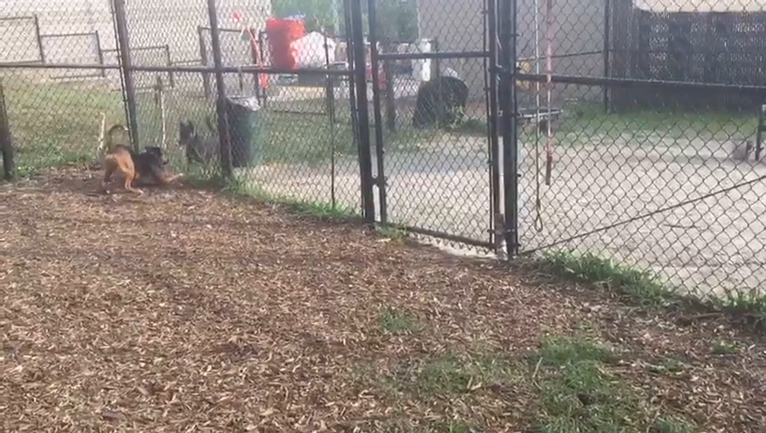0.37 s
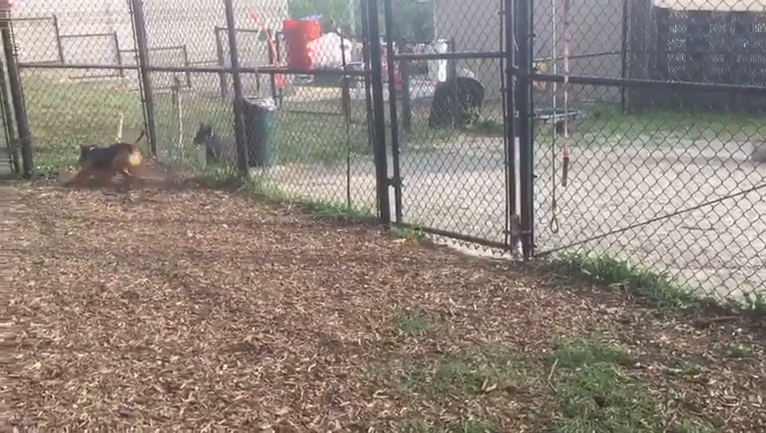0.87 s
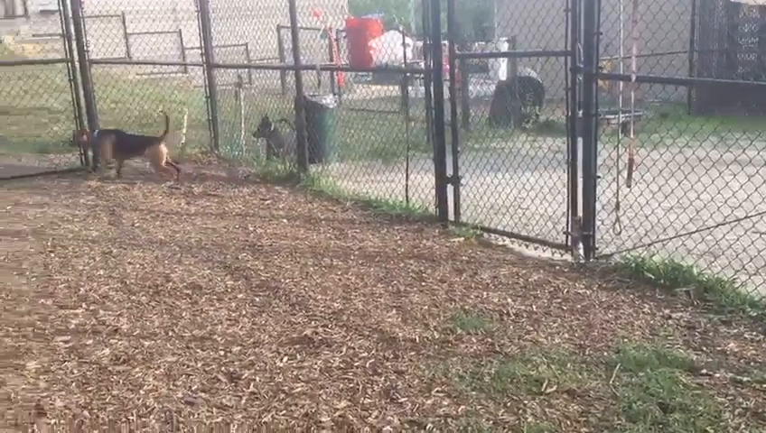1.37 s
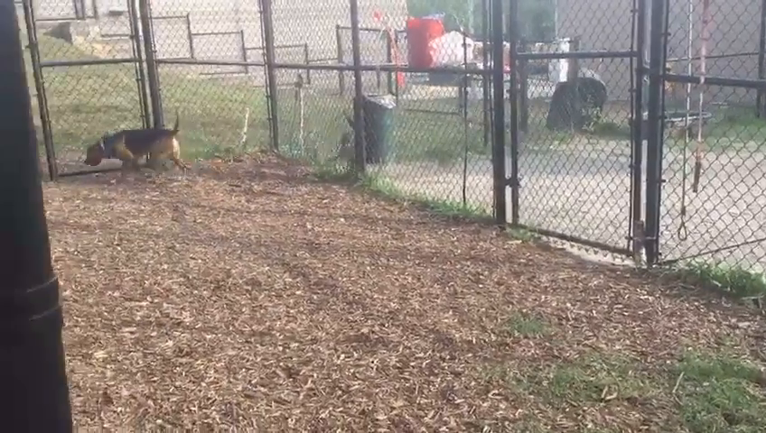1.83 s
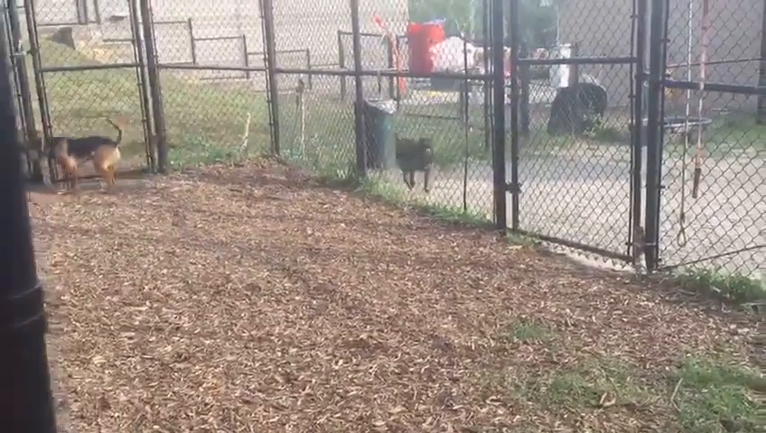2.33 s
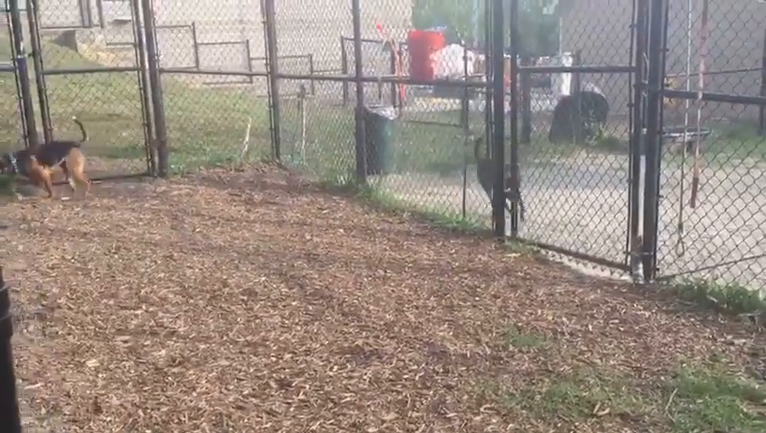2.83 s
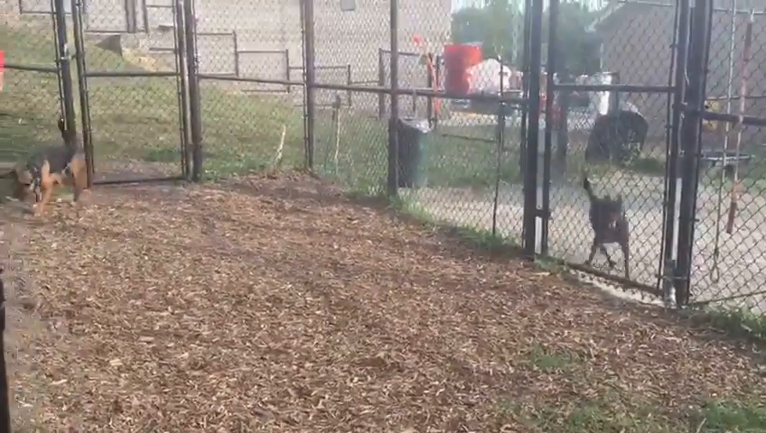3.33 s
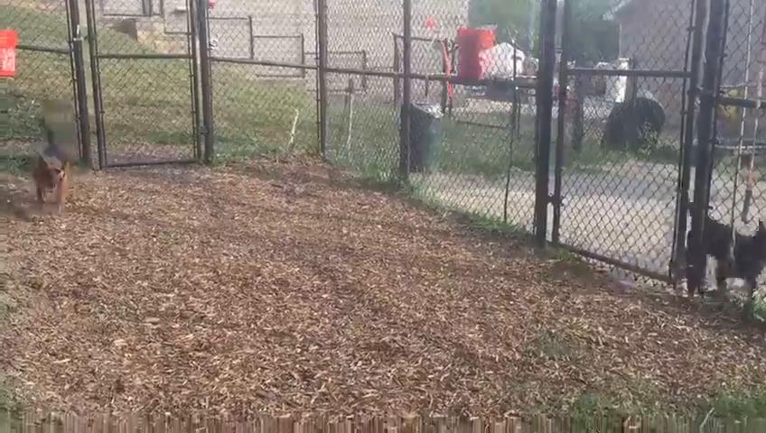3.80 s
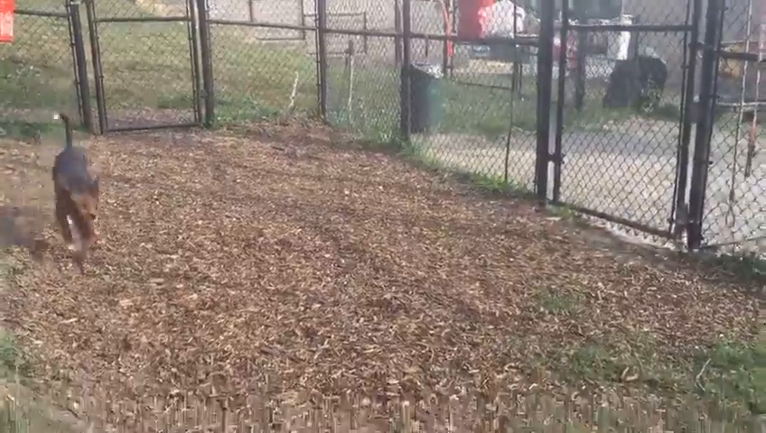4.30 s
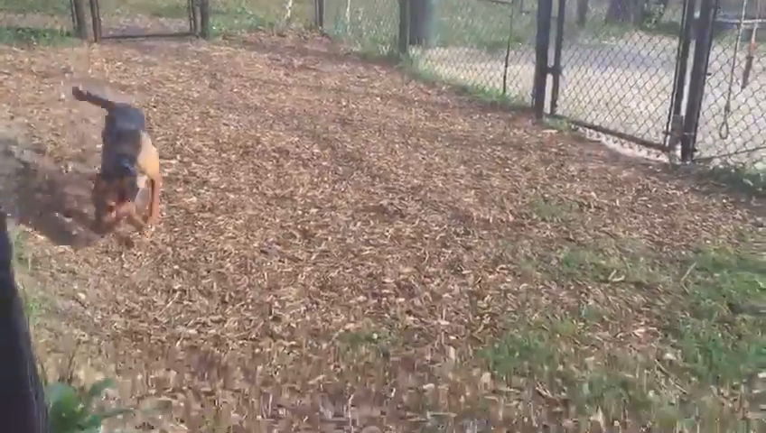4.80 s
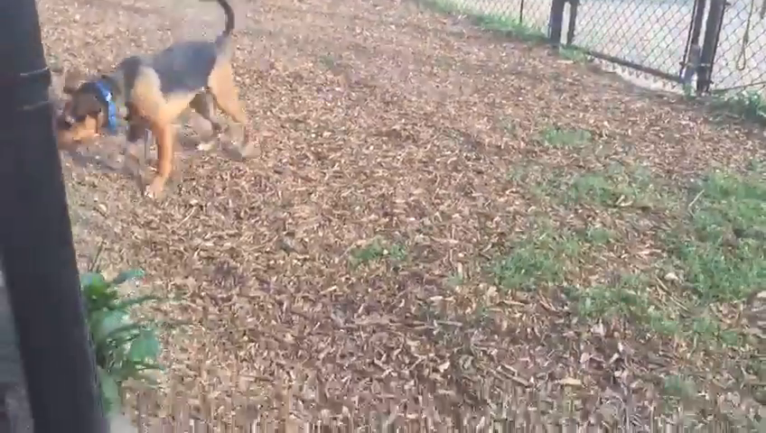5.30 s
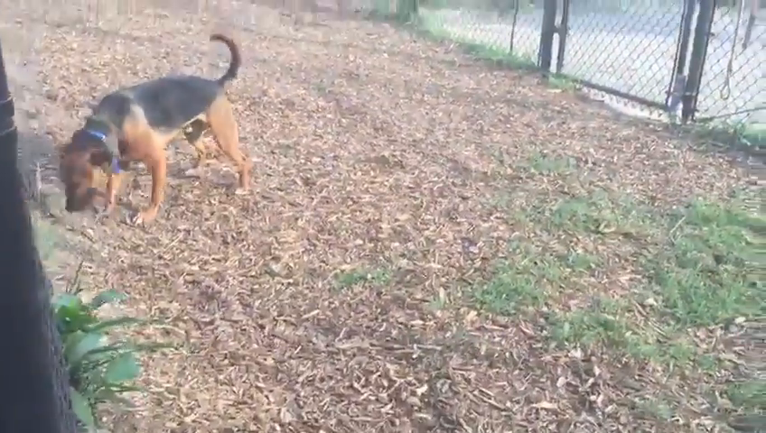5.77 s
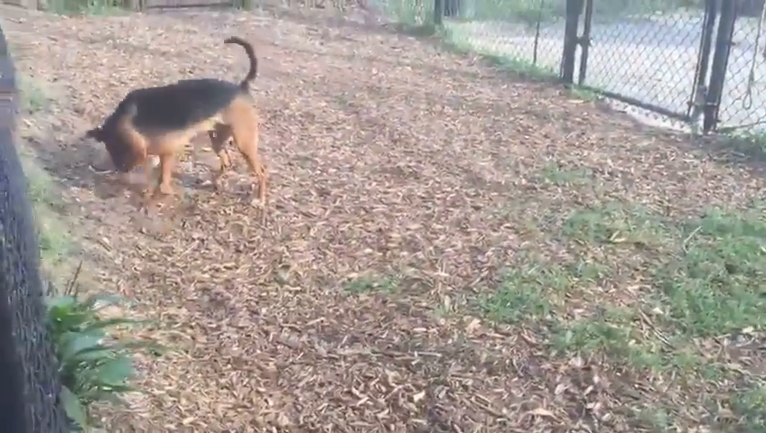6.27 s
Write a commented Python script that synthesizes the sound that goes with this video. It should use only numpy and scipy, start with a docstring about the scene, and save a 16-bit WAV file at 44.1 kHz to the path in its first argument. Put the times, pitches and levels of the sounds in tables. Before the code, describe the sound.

Single-channel handheld pickup of a playing dog: after a quiet opening of rumble, road hiss and faint paw crackles, quick high yips leap and drop in pitch, some strong, some small, with brief panting. A muffled bark closes the run. The yard returns a short faint echo. Near the end, the light dry crunch of paws on chips stands over swelling engine throb.

```python
"""A small dog yips in play in a fenced yard: gliding harmonic series, weighed by the throat, with rough noise.
A low bark, thin gliding whistles and panting of resonant noise lie between; walls return a short echo.
Paws crackle on wood chips; two slow engines throb as sums of firing orders over exhaust noise.
Coloured noise gives distant road hiss and a faint treble rustle; a wavering whine fades away early on."""
import sys
import numpy as np
from scipy import signal
from scipy.fft import rfft, irfft
from scipy.io import wavfile
from scipy.ndimage import uniform_filter1d

SR = 44100
rng = np.random.default_rng(int(sys.argv[2]) if len(sys.argv) > 2 else 0)


def wrap_up_sound(samples):
    """Save the sound to the file named by the first command line argument, as 16-bit audio."""
    columns = np.atleast_2d(samples).T
    # keep every value between -1 and 1, then stretch to whole-number steps
    tamed = np.clip(columns, -1, 1)
    steps = np.round(tamed * 32767).astype(np.int16)
    wavfile.write(sys.argv[1], SR, steps)


def gain_from_decibels(decibels):
    """Convert decibel values to linear amplitude factors."""
    exponent = np.asarray(decibels, float) / 20
    return 10 ** exponent


N = 281799


def in_time(rows):
    """Linear interpolation: the columns of a time table at every sample."""
    s, *columns = np.transpose(rows)
    return [np.interp(np.arange(N) / SR, s, c) for c in columns]


def each_call(tables, fade_s=0.0037):
    """Windowing: sample positions, edge fade and interpolated columns of every call."""
    for rows in tables:
        s, *columns = np.transpose(rows)
        at = np.arange(round(s[0] * SR), round(s[-1] * SR))
        fade = np.minimum(1, np.minimum(at - at[0], at[-1] - at) / (fade_s * SR))
        yield at, fade, [np.interp(at / SR, s, c) for c in columns]


def rms_one(x):
    """Power normalisation: scales to a root mean square of one."""
    return x / np.sqrt(np.mean(x ** 2) + 1e-20)


def at_hz(points, hz):
    """Spectral envelope: interpolates levels along a logarithmic frequency axis."""
    return np.interp(np.log(hz), np.log(np.array(points)[:, 0]), np.array(points)[:, 1])


def drift(rate_hz, size=N):
    """Low-pass filtered noise: a random wander up to a rate, with unit rms."""
    r = np.exp(-2 * np.pi * rate_hz / SR)
    run_in = round(SR / rate_hz)
    noise = rng.standard_normal(size + run_in)
    return rms_one(signal.lfilter([1], [1, -2 * r, r * r], noise)[run_in:])


def coloured(spectrum, source=None):
    """Spectral shaping: noise, or another source, band-limited to a spectrum at unit rms."""
    hz = np.maximum(np.fft.rfftfreq(N, 1 / SR), 1)
    inside = (hz > spectrum[0][0]) & (hz < spectrum[-1][0])
    source = rng.standard_normal(N) if source is None else source
    return rms_one(irfft(rfft(source) * gain_from_decibels(at_hz(spectrum, hz)) * inside, N))


# colour of turbulent air in throat and mouth: (frequency [Hz], density [dB per Hz])
MOUTH_AIR = [(500, -14), (1000, -12), (1700, -3), (2500, -5), (3100, -10)]


def voice(calls, voices, throat, jitter=0.023, shimmer=0.45, throb=0.71, bend=0.33):
    """Source-filter principle: fold harmonics weighed by the throat; roughness modulates and adds air."""
    slack_tilt = 0.11      # dB per octave for each octave per s of fall: slackening folds lose overtones
    slack_evens = 31       # octaves per s of fall that shrink the odd-even contrast by a factor e
    effort_tilt = 0.3      # dB per octave for each dB below -15.5 dB: soft sounds have fewer overtones
    rasp_db = -11          # air leaking past fully rough folds, against the voice
    out, air = np.zeros(N), coloured(MOUTH_AIR)
    k = np.arange(1, 20)[:, None]      # harmonic numbers
    for (at, fade, (hz, level_db, rough)), (tilt, odd_db, throb_hz) in zip(each_call(calls), voices):
        size = len(at)
        rough = np.clip(rough, 0, 1)
        falling = np.clip(-np.gradient(np.log2(hz)) * SR, 0, 80)      # octaves per s
        tilt = tilt + slack_tilt * falling - effort_tilt * (level_db + 15.5)
        odd_db = odd_db * np.exp(-falling / slack_evens)

        flutter = 2 * np.pi * np.cumsum(throb_hz * (1 + .15 * drift(40, size))) / SR
        shaken_hz = hz * (1 + jitter * (rough + 0.12) * drift(280, size))
        phase = 2 * np.pi * np.cumsum(shaken_hz) / SR
        phase += bend * rough * np.cos(flutter)      # the flutter also hurries and delays the cycles

        harmonic_db = at_hz(throat, k * hz) - tilt * np.log2(k) + odd_db * (k % 2)
        strength = gain_from_decibels(harmonic_db) * (k * hz < throat[-1][0])
        strength /= np.sqrt(np.sum(strength ** 2, axis=0) / 2)      # level evened
        # resonances spread each pulse in time
        tone = np.sum(strength * np.sin(k * phase + .6 * k ** 2), axis=0)
        shaking = 1 + rough * (throb * np.sin(flutter) + shimmer * drift(500, size))
        out[at] += gain_from_decibels(level_db) * fade * tone * shaking
        out[at] += gain_from_decibels(level_db + rasp_db) * fade * rough * air[at]
    return signal.sosfilt(signal.butter(4, 330, "high", fs=SR, output="sos"), out)


# one table a yip; the pitch jumps where the folds change register:
# (time [s], pitch [Hz], level [dB], roughness [0-1])
YIP_CALLS = [
    [(1.728, 928, -43.5, 0), (1.733, 961, -22, 0.08), (1.742, 1047, -18, 0), (1.751, 1208, -18, .15),
     (1.7535, 1689, -13, 0), (1.768, 1643, -7.5, .2), (1.785, 1736, -7, 0.28), (1.8, 1820, -9, 0.24),
     (1.813, 1830, -16.5, .25), (1.819, 1444, -13.5, 0.08), (1.83, 1210, -25, 0.2)],
    [(1.986, 1560, -37, 0.08), (1.993, 1527, -16.5, 0), (2.0, 1645, -21, 0.3), (2.012, 1663, -10.5, .15),
     (2.0148, 1600, -10, 0.7), (2.0154, 789, -16.5, 0.4), (2.025, 676, -17, 0.6), (2.036, 682.4, -15, 0.5),
     (2.047, 747, -11, 0.2), (2.056, 706.5, -16, 0.3), (2.068, 620, -16.5, .45), (2.087, 460, -30, 0.5),
     (2.098, 392, -39, 0.2)],
    [(2.477, 2110, -26, 0), (2.486, 2019, -15.5, 0.11), (2.508, 1939, -4, 0.03), (2.517, 1833, -10, 0.3),
     (2.523, 1522, -4, .12), (2.529, 1091, -15, 0), (2.536, 946, -12, 0), (2.542, 773, -30.5, 0.3),
     (2.55, 670, -42, .2)],
    [(2.941, 1527, -43, 0.1), (2.946, 1330, -19.5, 0.3), (2.951, 940, -25, 0.3), (2.956, 798, -21.5, 0.3),
     (2.964, 766, -47, 0)],
    [(3.304, 947, -41, 0.2), (3.318, 939, -27.5, .1), (3.338, 1037, -19.5, .1), (3.35, 1073, -16, 0.01),
     (3.358, 1162, -24, .1), (3.365, 1175, -36, .03)],
    [(3.778, 2213, -31, 0.08), (3.785, 1985, -21, 0), (3.81, 1992, -14.5, 0.1), (3.82, 1905, -10, .2),
     (3.827, 1980, -26.5, 0.08), (3.832, 1502, -4, 0.02), (3.838, 1214, -16.5, 0), (3.845, 943, -15, 0.2),
     (3.853, 828, -22, 0.1), (3.858, 770, -48, .1)],
    [(4.181, 930, -35, 0.07), (4.188, 1058, -15.5, .1), (4.195, 1060, -15, 0.06), (4.202, 1176, -17, 0),
     (4.207, 1290, -40, .06)],
    [(4.244, 2138, -45, 0.4), (4.252, 2060, -23.5, 0), (4.258, 2142, -24.5, 0.5), (4.278, 2100, -26.5, 0.2),
     (4.285, 2055, -24.5, .4), (4.292, 1960, -41, 0.4)],
    [(5.098, 1112, -46, .6), (5.108, 1210, -36, 0.9), (5.115, 1311, -35, .5), (5.121, 1240, -28.5, 0.5),
     (5.127, 1290, -53, 0.5)],
]
# folds of each yip: (basic source tilt [dB per octave], odd over even harmonics [dB], slower flutter [Hz])
YIP_FOLDS = [(3, -4.5, 620), (-1, -1.5, 170), (-1, 16, 499), (-2.5, -0.5, 400), (3, 1.5, 280),
             (6, -7.5, 420), (4.5, 5.5, 300), (-5.5, -4, 400), (-5, -8.5, 310)]
# throat resonances in the yips: (frequency [Hz], gain [dB])
YIP_THROAT = [(300, -7.5), (700, -10), (1100, -4), (1600, -0.5), (2200, -5.5), (2750, -16.5), (3050, -26.5),
              (3300, -38), (4300, -22.5), (5300, -50.5), (7000, -50.5), (7900, -13), (8600, -66)]


def yips():
    """Register change in phonation: high harmonic glides whose pitch leaps."""
    return voice(YIP_CALLS, YIP_FOLDS, YIP_THROAT)


# the bark's course: (time [s], pitch [Hz], level [dB], roughness [0-1])
BARK_CALL = [
    [(4.642, 396.5, -42.5, 0.35), (4.657, 412, -28, .25), (4.678, 389, -25, .2), (4.688, 410, -24.5, .2),
     (4.698, 438, -22, 0.56), (4.704, 390, -30, .3), (4.71, 410, -45, .3)],
]
# its folds: (basic source tilt [dB per octave], odd over even harmonics [dB], slower flutter [Hz])
BARK_FOLDS = [(-4, .3, 250)]
# throat resonances with the mouth half closed: (frequency [Hz], gain [dB])
HALF_CLOSED_THROAT = [(300, -10.5), (800, -10.5), (1220, 3.5), (1600, -3.5), (2000, -8), (2450, -7),
                      (3200, -12.5), (3600, -35), (8400, -41)]


def bark():
    """Source-filter principle: a low harmonic call through a half-closed mouth."""
    return voice(BARK_CALL, BARK_FOLDS, HALF_CLOSED_THROAT)


# thin whistles through the nose:
# (start [s], length [s], starting pitch [Hz], glide [Hz per s], level before the envelope [dB])
NOSE_WHISTLES = [(2.372, 0.034, 4500, 2000, -38), (2.462, .02, 4800, 1000, -50),
                 (2.823, 0.022, 4740, 1497, -36.5), (3.707, 0.022, 4590, 10000, -34),
                 (3.758, 0.03, 5000, 24996, -49.5), (4.227, 0.014, 4630, 14994, -33),
                 (4.238, 0.017, 5140, 11998, -40), (3.285, 0.02, 4960, -2000, -53),
                 (4.162, .014, 4870, 1000, -50)]


def whistles(attack_s=0.0036, release_s=0.015):
    """Linear frequency modulation: single tones glide under a squared envelope."""
    out = np.zeros(N)
    for start, length, hz, glide, db in NOSE_WHISTLES:
        t = np.arange(round(length * SR)) / SR
        shape = np.minimum(1, np.minimum(t / attack_s, (length - t) / release_s)) ** 2
        tone = np.sqrt(2) * np.sin(2 * np.pi * (hz * t + glide * t ** 2 / 2))
        out[round(start * SR):][:len(t)] += gain_from_decibels(db) * shape * tone
    return out


# puffs of air through the open mouth:
# (peak time [s], rise [s], fall [s], peak hiss level [dB], mouth shape [factor on resonance frequency])
BREATH_PUFFS = [(1.8, 0.065, 0.061, -35, 1.3), (1.742, .015, .02, -50, 1.02),
                (1.85, 0.032, 0.051, -52.5, 1.02), (2.045, 0.063, 0.072, -33, 1.1),
                (2.002, 0.013, 0.028, -46.5, 0.57), (2.529, 0.078, .03, -36, 1),
                (2.561, 0.041, 0.025, -38.5, 1.1), (2.975, 0.038, 0.066, -52, 0.71),
                (3.279, 0.016, 0.029, -47, 0.85), (3.352, 0.018, 0.016, -53, 1.4),
                (3.448, 0.11, .075, -44, 1.1), (3.716, .01, .016, -50, .9), (3.83, .055, .045, -34.5, .9),
                (3.873, 0.021, .07, -41.5, .95), (4.268, 0.039, .05, -34.5, 0.89),
                (4.19, .025, 0.052, -52, .96), (4.33, 0.051, 0.042, -39.5, .85),
                (4.73, 0.078, 0.025, -39, 0.7), (5.096, .08, 0.077, -49, .99)]
# mouth resonances at shape 1: (frequency [Hz], width [Hz], relative level [dB])
BREATH_RESONANCES = [(3500, 620, -3.5), (4200, 860, -2.5), (5970, 1600, -2), (7500, 2100, -16.5),
                     (8260, 810, -6)]


def breaths(flicker_db=4.5, flicker_hz=45):
    """Turbulence through resonators: independently flickering hiss bands and duller throat noise."""
    span_db, rounding = 23.5, 1.66      # range of each puff; power of its fall: 1 pointed, 2 round
    dull_db, dull_follows = -49, 0.24   # throat noise under a puff of -44.5 dB; its share of the swing
    out = np.zeros(N)
    dull = coloured(MOUTH_AIR) * gain_from_decibels(flicker_db * drift(flicker_hz))
    puffs = [[(s - rise, -1), (s, 0), (s + fall, 1)] for s, rise, fall, *_ in BREATH_PUFFS]
    for (at, fade, (away,)), (*_, peak_db, shape) in zip(each_call(puffs, fade_s=0.004), BREATH_PUFFS):
        hiss = 0
        hiss_db = peak_db - span_db * np.abs(away) ** rounding
        for hz, width_hz, db in BREATH_RESONANCES:
            edges = [shape * hz - width_hz / 2, shape * hz + width_hz / 2]
            band = signal.butter(2, edges, "band", fs=SR, output="sos")
            flicker = gain_from_decibels(db + flicker_db * drift(flicker_hz, len(at)))
            hiss = hiss + flicker * rms_one(signal.sosfilt(band, rng.standard_normal(len(at))))
        throat = gain_from_decibels(dull_db + dull_follows * (hiss_db + 44.5)) * dull[at]
        out[at] += fade * (gain_from_decibels(hiss_db) * rms_one(hiss) + throat)
    return out


# ground, fence and wall: (delay [s], level [dB])
YARD_ECHOES = [(.012, -20), (.036, -26), (.052, -27)]


def yard(x, smear_s=0.0036, tail_t60_s=0.2, tail_db=-21):
    """Convolution with an impulse response: smeared reflections and a scattered, decaying tail."""
    t = np.arange(round(.4 * SR)) / SR
    # tail_db is the energy of the decay from zero delay; only its part after 8 ms sounds
    power = gain_from_decibels(tail_db - 60 * t / tail_t60_s) ** 2 * 14 / tail_t60_s * (t > .008)
    for s, db in YARD_ECHOES:
        power += gain_from_decibels(db) ** 2 * (t > s) * np.exp(-np.maximum(t - s, 0) / smear_s) / smear_s
    return signal.fftconvolve(x, np.sqrt(power / SR) * rng.standard_normal(len(t)))[:N]


# paws on wood chips: (onset [s], level before rise and decay [dB])
PAW_STEPS = [(0.7505, -50), (1.0153, -44.5), (1.09, -51.5), (1.1453, -57.5), (1.278, -57), (1.92, -43.5),
             (2.7362, -50), (5.2048, -44), (5.3207, -41.5), (5.4935, -42), (5.5468, -44.5), (5.633, -50),
             (5.712, -45.5), (5.851, -42.5), (5.902, -45.5), (5.96, -51), (6.1544, -50), (6.2273, -48)]
# colour of the crackle: (frequency [Hz], density [dB per Hz])
CHIP_COLOUR = [(2500, -21.5), (4000, -5), (6000, -9), (8300, 4.5)]


def steps(grains_per_s=4800.0, spread_db=1.0, rise_s=0.012, t60_s=0.13):
    """Random impulse process: each paw sets off a crackle of small chips that decays exponentially."""
    sizes = gain_from_decibels(spread_db * np.minimum(rng.exponential(1, N), 5)) * rng.choice([-1, 1], N)
    grains = sizes * (rng.random(N) < grains_per_s / SR)
    crackle = coloured(CHIP_COLOUR, grains)
    t, shape = np.arange(N) / SR, np.zeros(N)
    for s, level_db in PAW_STEPS:
        since = np.maximum(t - s, 0)
        shape += gain_from_decibels(level_db - 60 * since / t60_s) * np.minimum(1, since / rise_s)
    return shape * crackle


def order(phase, k, db):
    """Harmonic motion: one multiple of the firing cycle, at a random starting phase."""
    return np.sqrt(2) * gain_from_decibels(db) * np.sin(k * phase + 2 * np.pi * rng.random())


# cycle rate of two idling engines: (time [s], first [cycles per s], second [cycles per s])
ENGINE_RATES = [(0, 21.5, 26.15), (3.5, 21.48, 25.85), (4.2, 21.33, 25.75), (5.1, 21.1, 25.7),
                (6.39, 20.45, 25.35)]
# how loud each engine runs: (time [s], first [dB], second [dB])
ENGINE_LOADS = [(0.0, -63, -34), (0.05, -38, -47), (1.03, -36.5, -42), (1.16, -32.5, -44),
                (2.17, -39, -46.5), (2.31, -31, -45), (3.33, -35, -41), (3.65, -29, -33), (4.15, -35, -37),
                (4.63, -30.5, -32), (5.09, -28, -39.5), (5.32, -34, -30.5), (5.5, -26.5, -27),
                (5.62, -35.5, -38.5), (5.73, -29.5, -34), (5.92, -25, -35), (6.26, -28.5, -28.5),
                (6.39, -35, -30.5)]
# orders of each engine, before the waver: (multiple of the cycle rate, level against the load [dB])
FIRST_ENGINE_ORDERS = [(2, -27), (3, -10.5), (4, -5.5), (5, 0.7), (5.5, -17), (6, -18), (7, -9.5),
                       (8, -11.5), (9, -18), (10, -20), (11, -20), (12, -35.5), (13, -36)]
SECOND_ENGINE_ORDERS = [(2, -10), (3, -5.5), (4, -8.5), (5, 0.6), (7, -3.5), (8, -16)]


def engines(waver_db=4.5, waver_hz=3.0, steady_db=5, least_waver=0.4):
    """Fourier synthesis: orders of two firing cycles, the weaker ones swelling more, each on its own."""
    out = np.zeros(N)
    order_tables = (FIRST_ENGINE_ORDERS, SECOND_ENGINE_ORDERS)
    for rate, load_db, table in zip(in_time(ENGINE_RATES), in_time(ENGINE_LOADS), order_tables):
        phase = 2 * np.pi * np.cumsum(rate) / SR
        for k, db in table:
            # orders steady_db or more below 0 dB waver fully, the strongest by the least share
            share = np.clip(-db / steady_db, least_waver, 1)
            out += order(phase, k, load_db + db + waver_db * share * (drift(waver_hz) - .5))
    return out


# low exhaust noise: (frequency [Hz], density [dB per Hz])
RUMBLE_COLOUR = [(13, -55), (22, -13.5), (75, 2), (98, -4), (150, -7), (190, -3.5), (338, -19.5),
                 (427, -19), (500, -36), (650, -54.5), (1100, -120)]
# its course: (time [s], level [dB])
RUMBLE_LEVEL = [(0, -40.5), (1.2, -41), (1.7, -37), (2.9, -36), (3.7, -37), (4.3, -39.5), (5.0, -39),
                (5.4, -35), (6.39, -38)]


def exhaust_rumble():
    """Amplitude-modulated noise: low exhaust noise swells and sinks."""
    level_db, = in_time(RUMBLE_LEVEL)
    return gain_from_decibels(level_db) * coloured(RUMBLE_COLOUR)


# tyre hiss: (frequency [Hz], density [dB per Hz])
ROAD_SPECTRUM = [(150, -41.5), (250, -10.5), (293, -7.5), (422, -17.5), (525, -10), (573, -12.5),
                 (626, -11.5), (982, -6), (1520, -3.5), (1660, -3), (1890, -8), (2800, -20.5), (4800, -42),
                 (6810, -53.5), (8110, -32.5), (10500, -82.5), (17800, -120)]


def road(level_db=-36, flicker_db=1.4):
    """Broadband noise: tyres far away hiss smoothly, strongest between one and two kilohertz."""
    return gain_from_decibels(level_db + flicker_db * drift(5)) * coloured(ROAD_SPECTRUM)


# faint rustle, louder as the dog comes near: (time [s], level before flicker [dB])
RUSTLE_LEVEL = [(0, -65.5), (1.7, -66), (1.95, -61), (2.6, -66.5), (2.75, -60), (3.0, -60), (3.2, -64.5),
                (3.5, -62), (4.4, -58.5), (5, -59.5), (5.5, -57), (6.39, -62)]
# its colour: (frequency [Hz], density [dB per Hz])
RUSTLE_COLOUR = [(2500, -12), (3500, 2), (5000, -7.5), (6500, -11.5), (8200, -11.5)]


def treble_rustle(flicker_db=2.0):
    """Amplitude-modulated noise: a faint treble hiss flickers."""
    level_db, = in_time(RUSTLE_LEVEL)
    return gain_from_decibels(level_db + flicker_db * drift(11)) * coloured(RUSTLE_COLOUR)


def whine(waver_db=6.0, waver_hz=8, wander_hz=8.0):
    """Random amplitude and frequency modulation: a thin far tone comes and goes, fades and stops."""
    pitch_hz, start_db, fade_db_s, end_s = 1626, -40.5, 4.5, 1.5
    t = np.arange(N) / SR
    level_db = start_db - fade_db_s * t + waver_db * np.tanh(drift(waver_hz))
    phase = 2 * np.pi * np.cumsum(pitch_hz + wander_hz * drift(5.63)) / SR
    ending = np.clip((end_s - t) / 0.11, 0, 1)
    return np.sqrt(2) * gain_from_decibels(level_db) * ending * np.sin(phase)


def scene():
    """Superposition: the dog and its echo over the other sounds, in one channel."""
    dog = yips() + bark() + whistles() + breaths()
    background = engines() + exhaust_rumble() + road() + treble_rustle() + whine()
    return (dog + yard(dog) + steps() + background)[None]


def band_limit(x):
    """A steep low-pass at the top of the band."""
    return signal.sosfilt(signal.butter(12, 8260, fs=SR, output="sos"), x)


def record(dry, knee_db=-16, ratio=0.29, release_db_s=30):
    """Dynamic range compression: gain eases off on loud calls, recovers slowly; the top is cut."""
    t = np.arange(N) / SR
    level_db = 10 * np.log10(uniform_filter1d(dry[0] ** 2, size=441) + 1e-12)      # over 10 ms
    excess_db = np.maximum(level_db - knee_db, 0)
    # each peak of the excess is held and falls at the release rate
    held_db = np.maximum.accumulate(excess_db + release_db_s * t) - release_db_s * t
    mix = dry * gain_from_decibels(-np.clip(ratio, 0, 1) * uniform_filter1d(held_db, size=221))
    mix = signal.sosfilt(signal.cheby2(10, 60, 8750, fs=SR, output="sos"), mix)
    return band_limit(mix)


dry = scene()
out = record(dry)
wrap_up_sound(out)
```